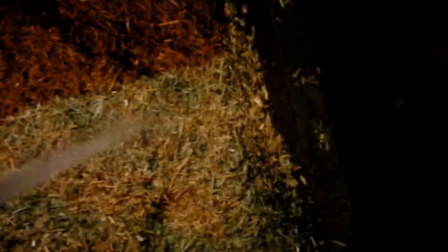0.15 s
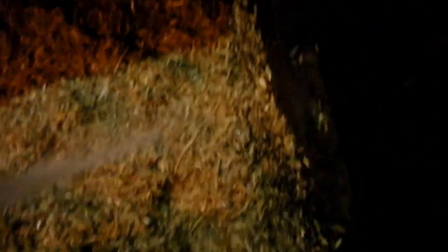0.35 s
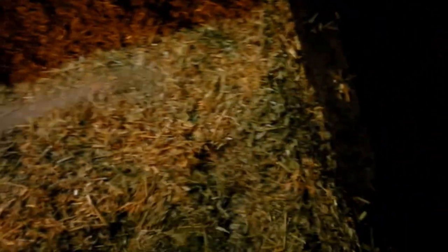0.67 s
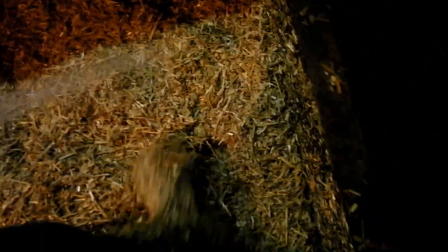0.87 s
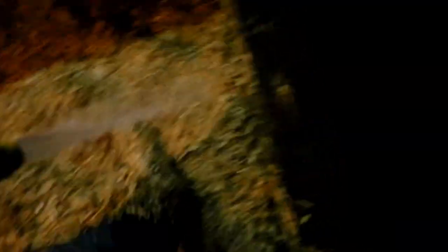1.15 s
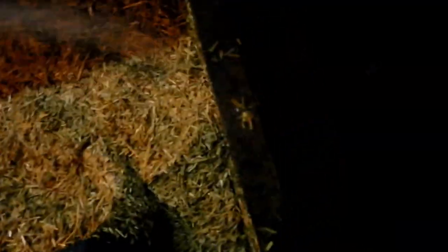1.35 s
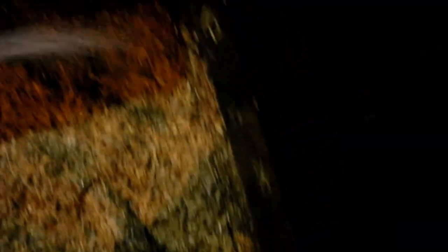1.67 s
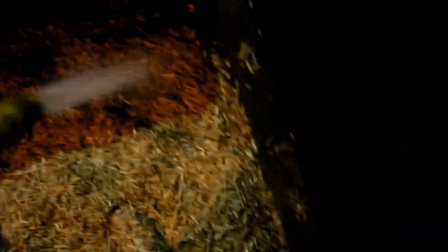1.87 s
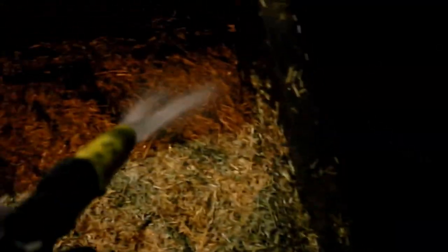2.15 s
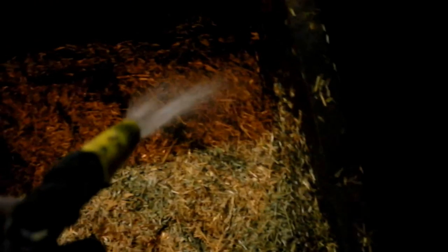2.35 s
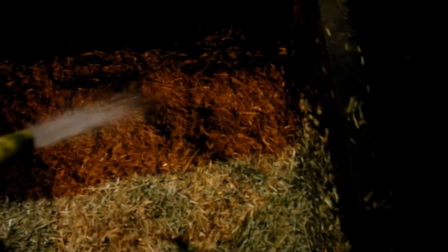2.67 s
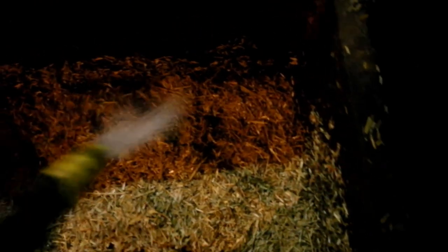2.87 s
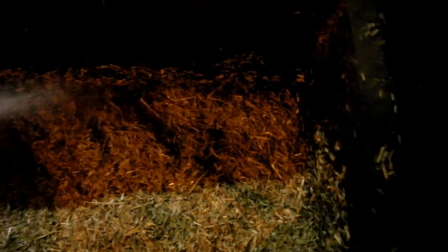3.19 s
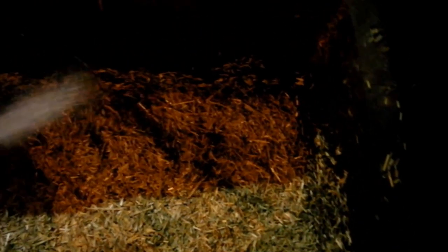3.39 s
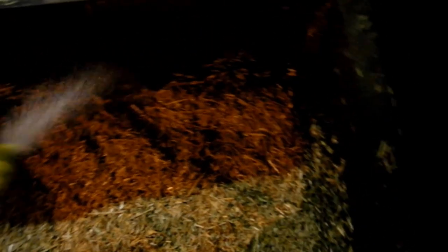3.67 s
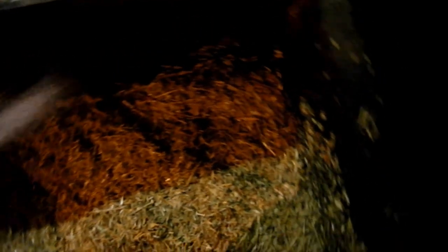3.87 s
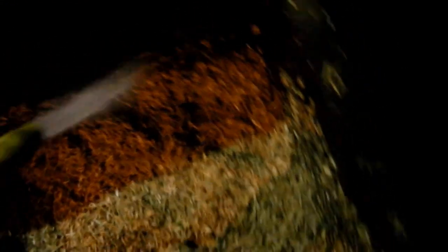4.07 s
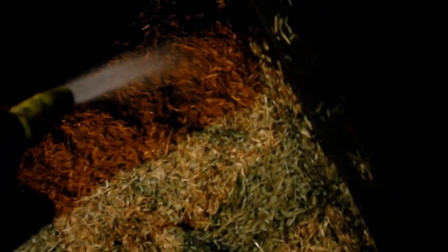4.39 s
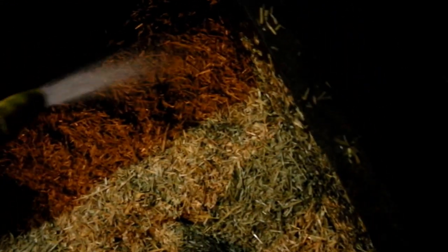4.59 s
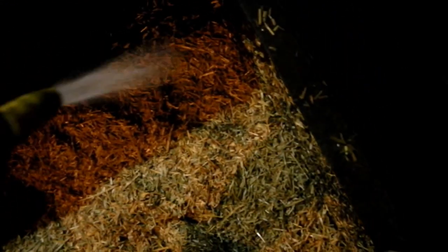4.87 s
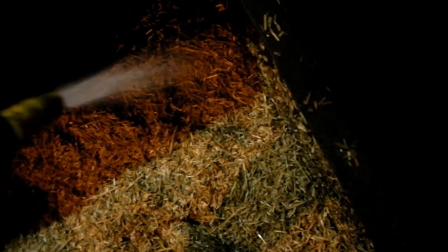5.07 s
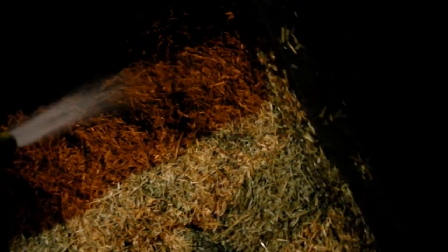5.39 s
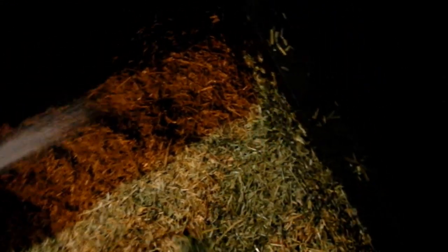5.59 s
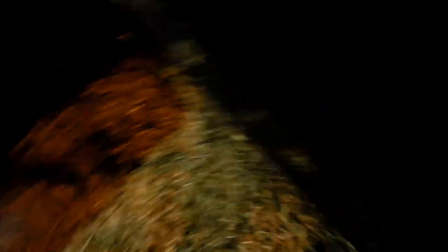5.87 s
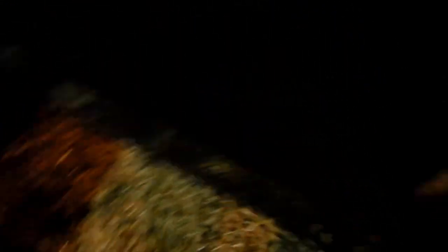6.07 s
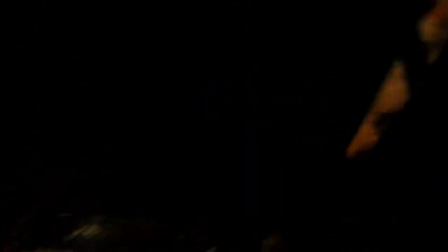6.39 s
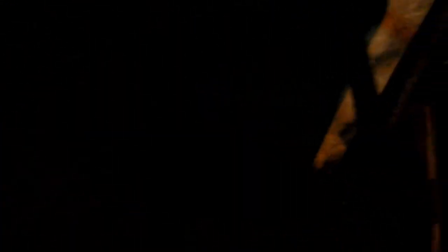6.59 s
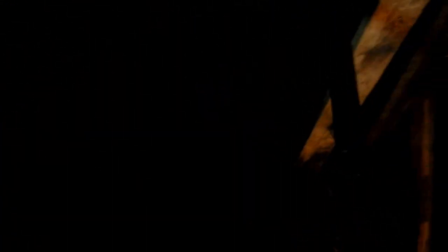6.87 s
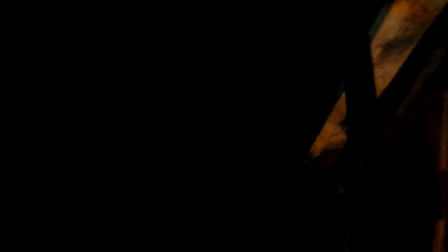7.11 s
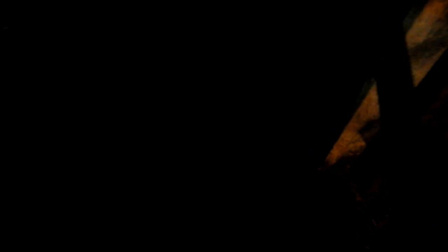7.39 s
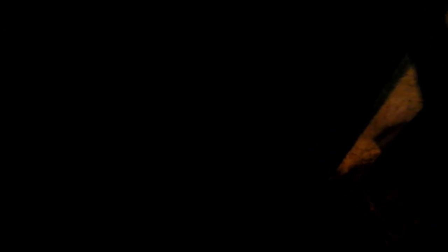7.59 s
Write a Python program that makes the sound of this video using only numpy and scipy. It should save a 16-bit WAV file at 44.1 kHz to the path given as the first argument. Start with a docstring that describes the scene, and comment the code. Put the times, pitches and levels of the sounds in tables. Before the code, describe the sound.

Water jet from a hose hissing and ticking onto straw, with occasional fat drops and dull, soft footsteps.

```python
"""A hose nozzle sweeps over chopped straw, heard through the two sound ports of a carried phone.
From the start the jet hisses and thousands of drops tick on the stalks. Fat drops and narrow ringing
patches soon join, and from 1 s boots thud softly. The splats crowd just after 2 s, a bright splash
swishes at 2.6 s, and the heaviest step lands at 6.3 s. Throughout, a side wall echoes and the ports
resonate at different pitches: left is bright, right has a drifting whistle near 4 kHz."""
import sys
import numpy as np
from scipy import signal
from scipy.fft import rfft, irfft, next_fast_len
from scipy.io import wavfile
from scipy.ndimage import uniform_filter1d, map_coordinates

SR = 44100
rng = np.random.default_rng(int(sys.argv[2]) if len(sys.argv) > 2 else 0)


def file_out(sig):
    """Save sig as 16-bit WAV at sys.argv[1]."""
    # one column per channel
    cols = np.atleast_2d(sig).T
    # limit, then scale
    lim = np.clip(cols, -1, 1)
    pcm = np.round(lim * 32767).astype(np.int16)
    wavfile.write(sys.argv[1], SR, pcm)


N = 341334

BANDS_HZ = 40 * 2 ** np.arange(0, 9, .5)
SWELL_DB, FLICKER_DB = 0.68, 1.3
# Each row: frequency in Hz, share of hiss power common to both ports when facing the jet.
COHERENCE = [(60, 0.66), (400, 0.93), (1200, 0.77), (2300, 0.58), (4500, 0.64), (7500, 0.15), (14000, 0.17)]
def spray(time, lag_ms, facing, turn_db):
    """Partial coherence: direct jet noise reaches the ports with a lag, diffuse noise independently."""
    swings = sweep(time)
    splash_pan_db = -0.2 * swings[-1]
    patter = drop_patter(time, lag_ms)
    jet = rng.standard_normal(N)
    direct = np.array([jet, delayed(jet, lag_ms)])
    diffuse = rng.standard_normal((2, N))
    swell_db = SWELL_DB * wander(16)
    out = 0
    for hz, envelope, level_db in zip(BANDS_HZ, patter, jet_spectrum(time, swings)):
        common = at_frequency(COHERENCE, hz) * facing ** min(hz / 1000, 1)
        hiss = np.sqrt(common) * direct + np.sqrt(1 - common) * diffuse
        sound = unit_rms(band(hiss * envelope, hz, octaves=.25))
        db = level_db + swell_db * min(hz / 2500, 1) + FLICKER_DB * wander(22)
        pan_db = (turn_db + splash_pan_db) * min(hz / 3000, 1)  # the phone shades only short waves
        out = out + sound * undb(db + np.array([pan_db, -pan_db]) / 2)
    return out


# Each row: time in seconds, treble level in dB, then 1 kHz patter, 2 kHz rattle and 4 kHz splash
# in dB relative to the treble.
JET_SWEEP = [(0.0, -38, -11, -11.5, 6.5), (.24, -33.5, -12.5, -8.5, 6.5), (0.41, -31.5, -9.5, -7.5, 1),
             (.68, -31.5, -12.5, -8.5, 5), (0.85, -32.5, -15.5, -6.5, 4), (1.06, -30.5, -12.5, -7, 4.5),
             (1.36, -32, -8, -5, -0.5), (1.44, -38, 0, -3.5, 4), (1.55, -38, -7.5, -6.5, 1.5),
             (1.64, -33.5, -9, -12, -3.5), (1.77, -36, -10.5, -8, 2), (1.94, -32, -8.5, -14, -3),
             (2.13, -29.5, -10.5, -10.5, 4), (2.25, -31.5, -10.5, -6.5, 7), (2.66, -30.5, -8, -6.5, 0),
             (2.71, -34, -12.5, -7, -1), (2.95, -33, -11.5, -6, -2), (3.14, -32, -11.5, -2.5, 1.5),
             (3.45, -34.5, -13, -6.5, -1), (3.88, -37.5, -14.5, -9.5, 0), (4.18, -35, -14, -5, 1),
             (4.26, -32, -13, -3.5, 1), (4.5, -30, -7.5, -8.5, 0.5), (4.72, -30, -10.5, -5, 3.5),
             (4.98, -31, -9.5, -6.5, 1.5), (5.11, -28.5, -10, -7.5, 0.5), (5.45, -31, -11, -5, 0),
             (5.63, -29.5, -12.5, -5, 2.5), (5.91, -30, -13.5, -5, 0), (6.21, -31, -17, -7.5, 4),
             (6.36, -32.5, -6, -8, 7.5), (6.49, -29.5, -16.5, -9.5, 4.5), (7.0, -32.5, -11.5, -6.5, 2.5),
             (7.17, -34.5, -7.5, -4, 4), (7.36, -30.5, -10, -7, 1.5), (7.74, -34.5, -12, -8.5, 1)]
def sweep(time):
    """Level varies with distance: four swings about the mean, in dB, as the jet nears and recedes."""
    levels = at_time(JET_SWEEP, time)
    return levels - levels.mean(axis=1, keepdims=True)


# Each row: frequency in Hz, base level in dB, weights of the treble, patter, rattle and splash swings.
SWEEP_RESPONSE = [(350, -48.5, 0.36, 0.27, 0.18, 0.17), (1120, -43, 1.1, 1.3, -0.11, 0.0065),
                  (2255, -39.5, 0.98, .05, 1.05, -0.27), (3920, -30.5, 1.07, .05, -0.25, 1.03),
                  (6030, -38.5, 0.8, 0.042, 0.096, -0.22), (9500, -34, 0.99, .05, -0.011, .1)]
# Each row: frequency in Hz, level added to that band in dB.
JET_COLOUR = [(40, -35), (68, -23.5), (105, -24), (170, -14.5), (280, -5), (500, -9), (900, -6),
              (1600, -5.5), (2300, -3), (3200, -9), (4500, -8.5), (6000, 5), (9000, -6.5), (14000, -3.5)]
# Each row: time in seconds, pitch in Hz of the port's whistle, which drifts as the hand cups it.
WHISTLE_PITCH = [(0.0, 3800), (0.06, 4040), (0.99, 4060), (2.28, 3840), (2.56, 4170), (3.64, 4000),
                 (3.81, 4150), (4.07, 3970), (5.24, 4050), (5.33, 3860), (6.1, 4030), (6.36, 3950),
                 (6.66, 4190), (7.2, 4020), (7.7, 4200), (7.74, 3970)]
# Each row: frequency in Hz, gain in dB per octave that the whistle rises.
DRIFT_GAIN = [(2000, 1), (3600, -16), (5100, 22), (9000, -9)]
def jet_spectrum(time, swings):
    """Spectral envelope: yields each band's level in dB, following the sweep and the whistle's drift."""
    drift = np.log2(at_time(WHISTLE_PITCH, time)[0])
    drift = drift - drift.mean()
    row_hz, *columns = np.transpose(SWEEP_RESPONSE)
    for hz in BANDS_HZ:
        base_db, *weights = [np.interp(np.log(hz), np.log(row_hz), column) for column in columns]
        steady_db = base_db + at_frequency(JET_COLOUR, hz)
        yield steady_db + weights @ swings + at_frequency(DRIFT_GAIN, hz) * drift


DROPS_PER_S, DROP_SCATTER_DB, DROP_OCTAVES, DROP_PAN_DB, BURST_MS = 1500, 3.5, 0.6, 2.5, .6
# Each row: frequency in Hz, share of the power carried by drops rather than smooth hiss.
DROP_SHARE = [(150, 0.25), (600, 0.17), (2000, 0.37), (4000, 0.24), (9000, 0.29)]
def drop_patter(time, lag_ms):
    """Shot noise: random impacts on the stalks give each band an envelope of brief, decaying puffs."""
    moment, rarity, register = rng.random((int(DROPS_PER_S * N / SR), 3)).T
    when = moment * N / SR
    size = undb(-DROP_SCATTER_DB * np.log(rarity + .02))  # few drops are large
    pitch_hz = 300 * 2 ** (5.8 * register)  # each stalk has its own pitch
    pan_db = DROP_PAN_DB * rng.standard_normal(len(when))
    drop_lag_ms = np.interp(when, time, lag_ms)
    decay = np.exp(-1000 / (BURST_MS * SR))
    envelopes = []
    for hz in BANDS_HZ:
        in_band = bell(np.log2(pitch_hz / max(hz, 200)), DROP_OCTAVES)
        impacts = impulses(when, drop_lag_ms, size * in_band, pan_db)
        bursts = unit_rms(signal.lfilter([1], [1, -decay], impacts))
        share = at_frequency(DROP_SHARE, hz)
        envelopes.append(np.sqrt(1 - share + share * bursts ** 2))
    return envelopes


# Each row: time in seconds, impulse strength in dB, left minus right in dB.
FAT_DROPS = [(0.34, 8, 4), (0.509, -4, 5), (0.612, -3, 6), (0.705, -4, -1), (0.733, 2, -5),
             (1.0695, 6.5, -8), (1.6781, -3, -3), (1.7799, 1, 0.2), (1.874, -2, -2), (2.0901, -2, -8.5),
             (2.1201, 5.5, -6), (2.144, 2, -3), (2.174, 1, -8), (2.222, 3, 0.2), (2.2874, 5, -6),
             (2.2908, 7, -2), (2.3174, -1, 0.2), (2.4573, -1, 5), (2.644, 4, -2), (3.0745, -2, 0.2),
             (3.497, 5, -2), (3.5414, -11, 2), (3.8644, -7, -1), (4.6014, -7, 0.2), (4.7765, -10, 0.2),
             (5.929, -7, .2), (6.2731, -1, -9), (6.2951, -2, -6), (6.3937, 4, -8), (6.4218, -8, 6),
             (6.4532, -4, 2), (6.5437, 6, -3), (6.823, 2, -4)]
def splats(time, lag_ms):
    """Impulse excitation: each fat drop bursts on the stalks as one band-limited click."""
    when, db, pan_db = np.transpose(FAT_DROPS)
    impacts = impulses(when, np.interp(when, time, lag_ms), undb(db), pan_db)
    return band(impacts, hz=3900, octaves=0.59)


# Each row: time of the peak in seconds, level in dB, pitch in Hz, length in seconds.
# Rows near 4 kHz are the port's whistle; the one at 5200 Hz is a bright splash.
RINGING_PATCHES = [(.45, -45, 1250, 0.81), (.9, -46, 4220, 0.71), (1.35, -40, 2200, .15),
                   (1.4, -52, 920, 0.32), (2.3, -45, 1340, 1.1), (2.63, -28, 5200, .14),
                   (3.9, -53.5, 1030, 1.8), (4.6, -48, 1310, .6), (4.8, -50, 4150, 0.97),
                   (5.2, -51, 1310, 0.55), (6.55, -43, 4180, 0.86), (7.12, -50, 590, .12),
                   (6.9, -51.5, 750, 1.8), (6.8, -52.5, 1030, 1.1)]
def ringing(time):
    """Narrow-band noise has pitch: ringing patches stand out of the hiss for a while."""
    return sum(noise_swell(time, *patch, octaves=0.1) for patch in RINGING_PATCHES)


# Each row: time of the peak in seconds, level in dB, pitch in Hz, length in seconds, spread in octaves.
BOOT_STEPS = [(1.0, -61.5, 70, 0.11, .2), (1.3, -61, 55, .25, .2), (1.5, -44, 168, 0.24, 0.65),
              (2.62, -62, 70, 0.11, .2), (3.05, -49.5, 90, 0.21, .55), (4.3, -57, 70.6, 0.27, 0.24),
              (6.32, -39, 200, 0.12, 1.1), (6.33, -45, 133, 0.21, .15), (6.65, -66, 45, .15, .2)]
def boots(time):
    """A soft impact holds mostly low frequencies: each boot in the straw is a dull swell of noise."""
    return sum(noise_swell(time, *step) for step in BOOT_STEPS)


WALL_CUTOFF_HZ = 2640
# Each row: time in seconds, echo delay in ms, echo gain in dB.
WALL_PATH = [(0, 4.1, -11.5), (1.6, 4.17, -17), (2.0, 3.74, -11), (3.3, 3.44, -20), (4.4, 3.6, -14),
             (6.0, 3.8, -12.5), (6.4, 3.07, -20), (7.74, 2.73, -12)]
def wall_echo(near, time):
    """Reflection: a side wall returns one dull echo whose path changes with the walk."""
    delay_ms, db = at_time(WALL_PATH, time)
    dull = signal.lfilter(*signal.butter(1, WALL_CUTOFF_HZ, fs=SR), near)
    return np.array([delayed(port, delay_ms) for port in dull]) * undb(db)


def noise_swell(time, peak_s, db, hz, length_s, octaves):
    """Amplitude modulation: a noise band rises and fades once, alike at both ports."""
    envelope = bell(time - peak_s, length_s / 3)
    return undb(db) * envelope * unit_rms(band(rng.standard_normal(N), hz, octaves))


def impulses(when_s, lag_ms, size, pan_db):
    """Time and level differences: each impact gives one impulse at each port."""
    def port(arrival_s, db):
        sample = np.clip(arrival_s * SR, 0, N - 1).astype(int)
        return np.bincount(sample, size * undb(db), N)
    return np.array([port(when_s, pan_db / 2), port(when_s + lag_ms / 1000, -pan_db / 2)])


def band(x, hz, octaves):
    """Band-pass filter, Gaussian on a log-frequency axis."""
    size = next_fast_len(N)
    f = np.arange(size // 2 + 1) * SR / size + 1
    return irfft(rfft(x, size) * bell(np.log2(f / hz), octaves), size)[..., :N]


def delayed(x, lag_ms):
    """Propagation delay that varies with time."""
    return map_coordinates(x, [np.arange(N) - lag_ms * SR / 1000], order=3, mode="nearest")


def wander(rate_hz):
    """Slow noise: ramps between random levels."""
    hold = int(SR / rate_hz)
    levels = np.repeat(rng.standard_normal(N // hold + 1), hold)
    return 0.89 * uniform_filter1d(levels, hold)[:N]


def at_time(table, time):
    """Linear interpolation of each column over time."""
    seconds, *columns = np.transpose(table)
    return np.array([np.interp(time, seconds, column) for column in columns])


def at_frequency(table, hz):
    """Interpolation on a log-frequency axis."""
    row_hz, values = np.transpose(table)
    return np.interp(np.log(hz), np.log(row_hz), values)


def bell(offset, width):
    """Gaussian curve with peak 1."""
    return np.exp(-.5 * (offset / width) ** 2)


def undb(db):
    """Amplitude ratio of a level in dB."""
    return 10 ** (np.asarray(db) / 20)


def unit_rms(x):
    """Normalisation to unit power."""
    return x / np.sqrt(np.mean(x ** 2))


# Each row: time in seconds, right port's lag in ms, facing the jet from 0 to 1, left minus right in dB.
PHONE_TURN = [(0, 0.048, 0.8, -1.4), (1.5, 0.061, 0.9, -0.1), (2.5, .02, 0.96, -1.9), (4, 0.069, 0.82, -1),
              (5.6, 0.045, 1, -0.3), (6.4, .16, 0.73, 0.4), (7.74, 0.14, 0.6, -0.1)]
def scene():
    """Superposition: spray, splats, ringing, boots and their echo add at the turning phone."""
    time = np.arange(N) / SR
    lag_ms, facing, turn_db = at_time(PHONE_TURN, time)
    near = spray(time, lag_ms, facing, turn_db) + splats(time, lag_ms) + ringing(time) + boots(time)
    return near + wall_echo(near, time)


SATURATION_LEVEL, CUTOFF_HZ = .95, 15000
# Each row, left port then right: resonance in Hz, bandwidth in Hz, sensitivity in dB.
PORT_CAVITIES = [(9680, 2860, -2), (4083, 830, 1)]
def record(dry):
    """Cavity resonance colours each port; saturation rounds the peaks and a low-pass cuts the top."""
    size = next_fast_len(N + SR // 10)
    f = np.arange(size // 2 + 1) * SR / size
    cavity = lambda hz, width_hz: 1 - (f / hz) ** 2 + 1j * f * width_hz / hz ** 2
    response = np.array([undb(db) / cavity(hz, width_hz) for hz, width_hz, db in PORT_CAVITIES])
    dip, overtone = cavity(hz=11850, width_hz=2300), cavity(hz=16300, width_hz=4400)
    response[1] *= dip / overtone  # the long right duct
    heard = irfft(rfft(dry, size) * response, size)[:, :N]
    rounded = SATURATION_LEVEL * np.tanh(heard / SATURATION_LEVEL)
    return signal.sosfilt(signal.ellip(16, .3, 95, CUTOFF_HZ, fs=SR, output="sos"), rounded)


dry = scene()
out = record(dry)
file_out(out)
```